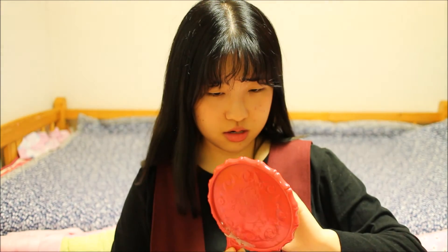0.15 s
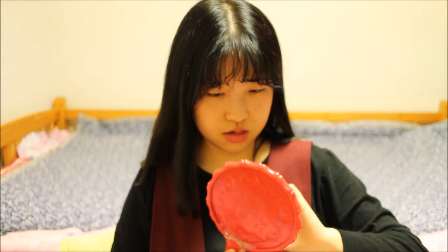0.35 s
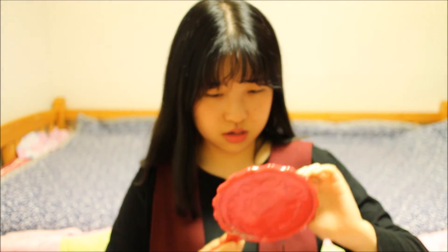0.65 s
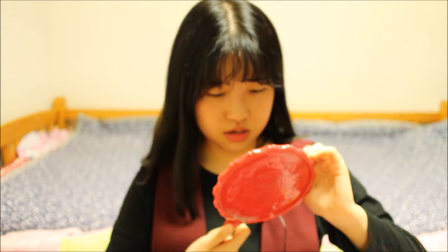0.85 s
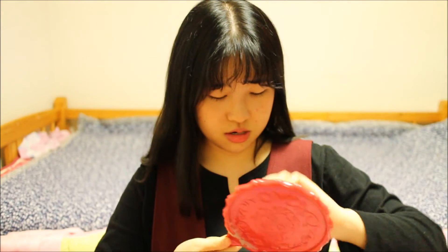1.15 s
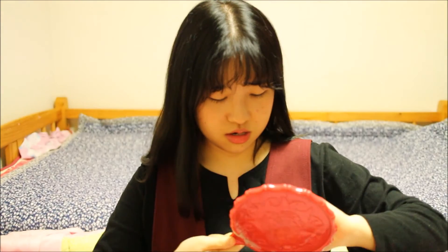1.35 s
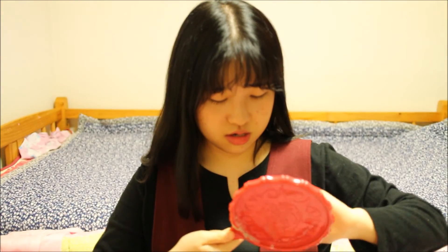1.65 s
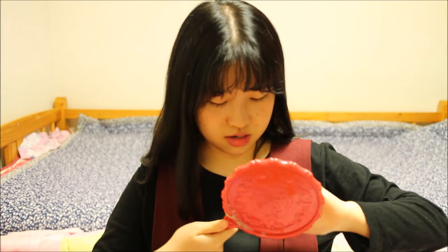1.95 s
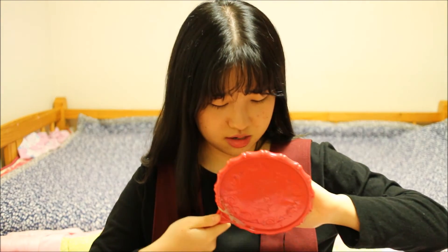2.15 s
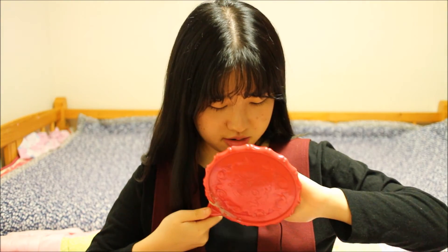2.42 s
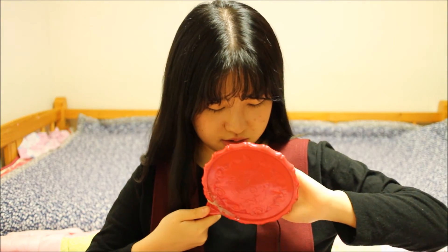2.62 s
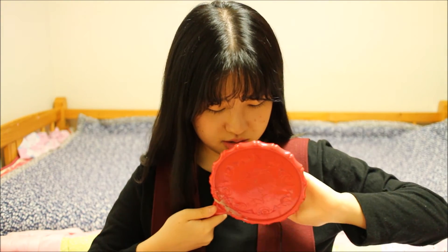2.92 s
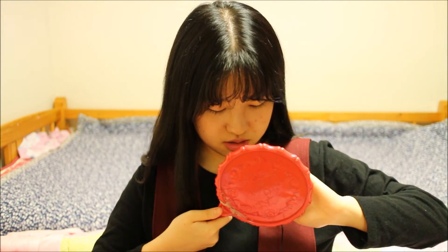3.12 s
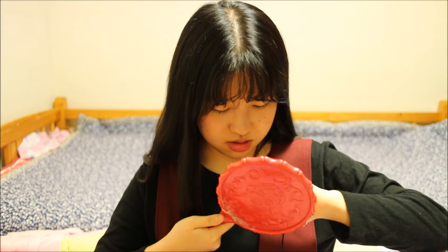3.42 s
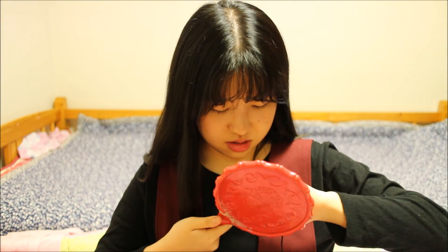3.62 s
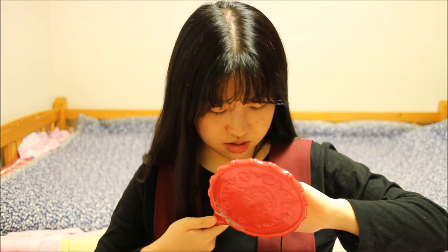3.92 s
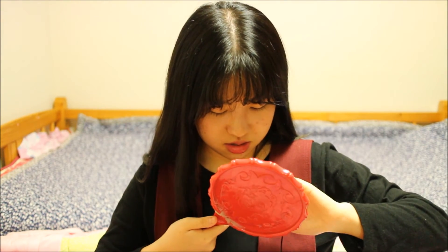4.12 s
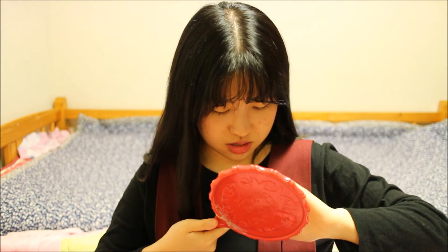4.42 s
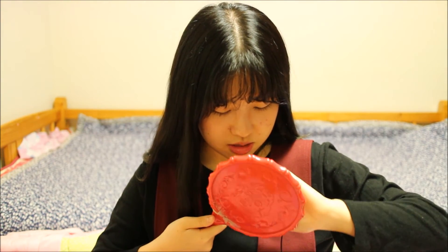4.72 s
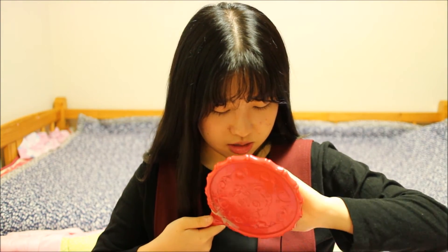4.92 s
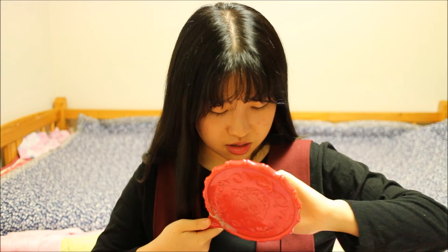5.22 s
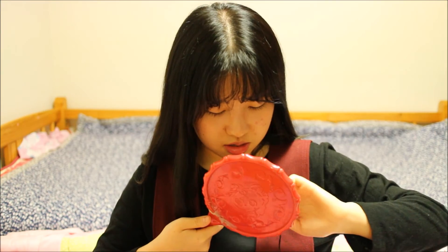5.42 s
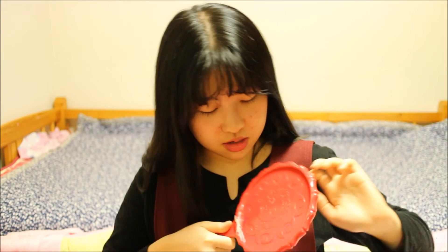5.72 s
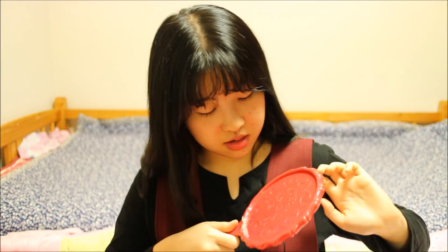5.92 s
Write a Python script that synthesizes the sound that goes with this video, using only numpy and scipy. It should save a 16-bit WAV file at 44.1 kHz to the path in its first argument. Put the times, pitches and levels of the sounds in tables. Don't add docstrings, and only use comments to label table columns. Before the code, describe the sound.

Close stereo microphone in a quiet, slightly hissy bedroom: nails and fingertips tap a round plastic hand mirror, each blow a sharp tick with a short hollow ring and small thump. A brief opening run gives way to faint skin rubs and dull house knocks, then uneven fast tapping resumes, mixing loud clacks and soft pad touches. Finally the handle turns with a low rub and grainy creaks.

```python
import sys
import numpy as np
from scipy import signal
from scipy.fft import rfft, irfft
from scipy.io import wavfile

SR = 44100
rng = np.random.default_rng(int(sys.argv[2]) if len(sys.argv) > 2 else 0)


def wav_out(sig):
    wavfile.write(sys.argv[1], SR, np.round(np.clip(np.atleast_2d(sig).T, -1, 1) * 32767).astype(np.int16))


def gain_from_db(level_db):
    decades = np.asarray(level_db, float) / 20
    return 10 ** decades


N = 267550
RING_T = np.arange(SR // 6) / SR

# [f/Hz, width/Hz, level/dB]
NAIL_COLOUR = [(3120, 443, -7.5), (6080, 1130, -5), (6760, 660, -0.5), (7810, 1760, -2.5), (9140, 1024, 6),
               (9556, 830, 4.5), (10450, 870, -5.5), (12290, 400, -5), (14400, 800, -16),
               (15300, 670, -17.5)]


def unit_energy(x):
    return x / np.sqrt(np.sum(x ** 2, axis=-1, keepdims=True) + 1e-20)


def modes(hz, t60):
    decay = gain_from_db(-60 * RING_T / np.clip(t60, 0.003, 1)[:, None])
    return np.sin(2 * np.pi * np.outer(hz, RING_T)) * decay


def sides(pan_db):
    return gain_from_db(np.multiply.outer([0.5, -0.5], pan_db))


def place(sounds, seconds):
    out = np.zeros((2, N + len(RING_T)))
    for k, start in enumerate(np.round(seconds * SR).astype(int)):
        out[:, start:start + len(RING_T)] += sounds[:, k]
    return out[:, :N]


def soften(x, contact_s):
    r = np.exp(-1 / (contact_s * SR))
    return signal.lfilter([(1 - r) ** 2], [1, -2 * r, r * r], x)


def radiate(x, low_hz):
    return signal.sosfilt(signal.butter(2, low_hz, "high", fs=SR, output="sos"), x)


def struck(level_db, mode_db, pan_db, hz, t60, scatter_db=1.6):
    strength = gain_from_db(mode_db + scatter_db * rng.standard_normal((len(level_db), len(hz))))
    shapes = modes(hz, t60)
    size = np.sqrt(np.sum((strength @ shapes) ** 2, axis=1))
    gain = (gain_from_db(level_db) / size)[:, None]
    return (sides(pan_db) * strength * gain) @ shapes


def resonances(x, peaks):
    out = 0
    for k, (hz, width_hz, db) in enumerate(peaks):
        r = np.exp(-np.pi * width_hz / SR)
        poles = [1, -2 * r * np.cos(2 * np.pi * hz / SR), r * r]
        band = signal.lfilter([(1 - r * r) / 2, 0, (r * r - 1) / 2], poles, x)
        out = out + (-1) ** k * gain_from_db(db) * band
    return out


def lumps(rate_hz):
    r = np.exp(-2 * np.pi * rate_hz / SR)
    slow = signal.lfilter([1], [1, -2 * r, r * r], rng.standard_normal(N + SR))[SR:]
    return slow / slow.std()


def preamp_hiss():
    # [f/Hz, density/dB]
    spectrum = np.array([(88, -30.5), (150, -12.5), (213, -10), (702, 2), (905, -3), (3500, -7),
                         (13400, -9.5), (16000, -11)])
    hz = np.maximum(np.fft.rfftfreq(N, 1 / SR), 1)
    shape = gain_from_db(np.interp(np.log(hz), np.log(spectrum[:, 0]), spectrum[:, 1])) * (hz < 15950)
    hiss = irfft(rfft(rng.standard_normal((2, N))) * shape, N)
    return gain_from_db(-69.5 + 3.5) * hiss / hiss.std()


def building_rumble():
    shared, *own = rng.standard_normal((3, N))
    band = signal.butter(1, [14, 45], "band", fs=SR, output="sos")
    rumble = signal.sosfilt(band, shared + 2.3 * np.array(own))
    rumble = soften(rumble, contact_s=0.00019) * gain_from_db(2.3 * lumps(3.9))
    return gain_from_db(-65.5) * rumble / rumble.std()


def house():
    # [t/s, f/Hz, level/dB, t60/s]
    knocks = [(0.098, 456, -66, .15), (0.262, 430, -58.5, .15), (0.674, 44.3, -38, 0.066),
              (0.758, 60.7, -40.5, 0.15), (0.899, 316, -49, 0.14), (.9, 740, -51, 0.12),
              (1.118, 476, -61, 0.17), (1.23, 688, -59.5, 0.33), (2.899, 490, -64, 0.58),
              (4.094, 480, -47, 0.16), (4.429, 490, -60, 0.59)]
    s, hz, db, t60 = np.transpose(knocks)
    blur = soften(rng.standard_normal((len(s), len(RING_T))), contact_s=0.006)
    soft_start = 1 - np.exp(-RING_T / 0.017)
    rings = gain_from_db(db)[:, None] * modes(hz, t60) * soft_start * np.cos(3 * np.pi * RING_T)
    rings *= 0.8 + 0.6 * blur / blur.std()
    return place(np.array([rings, rings]), s)


def bedroom(x):
    # [f/Hz, level/dB, t60/s]
    decay = np.array([(100, -42, 0.32), (395, -31.5, 0.16), (930, -23, 0.22), (2476, -25.5, 0.17),
                      (7920, -39, 0.34), (15420, -40.5, .12)])
    # [delay/s, level/dB]
    echoes = [(.0095, -27), (0.032, -38.5)]
    t = np.arange(SR // 3) / SR
    tail, edges_hz = 0, 70 * 2 ** np.arange(0, 8.1, 0.5)
    for low, high in zip(edges_hz, edges_hz[1:]):
        centre = np.log(low * high) / 2
        db, t60 = [np.interp(centre, np.log(decay[:, 0]), decay[:, c]) for c in (1, 2)]
        shared, *own = rng.standard_normal((3, len(t)))
        sos = signal.butter(2, [low, high], "band", fs=SR, output="sos")
        band = signal.sosfilt(sos, 4.8 * shared + own)
        band = unit_energy(band * gain_from_db(-60 * t / t60) * (t > 0.005))
        tail = tail + gain_from_db(db) * np.sqrt(high - low) * band / np.sqrt(SR / 2)
    for delay_s, db in echoes:
        spots = int(delay_s * SR) + np.arange(0, 60, 7)
        tail[:, spots] += gain_from_db(db - 17.5) * rng.standard_normal((2, 9))
    return signal.fftconvolve(x.mean(axis=0)[None], tail, axes=1)[:, :N]


def palm():
    # [f/Hz, width/Hz, level/dB]
    flesh = [(131.6, 92, 4), (280, 187, -3.5), (683, 170, -26)]
    turn_s, attack_s, fade_db_per_s = 5.7, 0.034, 21
    rub = resonances(resonances(rng.standard_normal(N), flesh), flesh)
    since = np.arange(N) / SR - turn_s
    rise = np.clip(1 + since / attack_s, 0, 1) ** 2
    level_db = -69.5 - fade_db_per_s * since + 3 * lumps(40)
    return rise * gain_from_db(level_db) * rub / rub.std()


def skin_brush():
    # [t/s, half length/s, level/dB]
    strokes = [
        (0.552, .05, -70),
        (0.677, 0.11, -64.5),
        (0.908, .06, -70),
        (1.0, 0.031, -65.5),
        (4.094, 0.037, -61),
    ]
    brush = resonances(rng.standard_normal((2, N)), NAIL_COLOUR)
    t = np.arange(N) / SR
    swell = sum(gain_from_db(db - 20 * np.abs(t - s) / half_s) for s, half_s, db in strokes)
    return swell * gain_from_db(2.7 * lumps(60)) * brush / brush.std()


def creaks():
    # [t/s, level/dB]
    lone = [
        (0.548, -58),
        (0.586, -57),
        (0.848, -64),
        (0.928, -59),
        (1.139, -68),
    ]
    # [start/s, end/s, gap/s, level/dB]
    slip_runs = [
        (5.698, 5.78, 0.011, -51.5),
        (5.81, 6.06, 0.019, -49),
    ]
    uneven, spread_db, fade_db_per_s = 0.142, 1.5, 36
    runs = [np.transpose(lone)]
    for start_s, end_s, gap_s, level_db in slip_runs:
        late, weak = rng.standard_normal((20, 2)).T
        s = start_s + gap_s * np.cumsum(1 + uneven * late)
        db = level_db + spread_db * weak - fade_db_per_s * (s - start_s)
        runs.append(np.array([s, db])[:, s < end_s])
    return np.hstack(runs)


def grip():
    # [f/Hz, level/dB, t60/s]
    grip_modes = [(93, 2.5, 0.011), (198, 1.5, 0.012), (342, -28, 0.065), (740, -14, 0.036)]
    s, level_db = creaks()
    hz, db, t60 = np.transpose(grip_modes)
    centred = np.zeros((len(s), len(hz)))
    slips = place(struck(level_db + 18.5, db, centred, hz, t60, scatter_db=3.0), s)
    return soften(slips, contact_s=0.0002)


def contacts():
    # [t/s, plate/dB, spot/dB (+ centre), upper re plate/dB, thump re plate/dB]
    centre_taps = [(0.0527, -21.5, 24, -5.5, -19), (0.202, -7, 3, -1, -10), (0.3599, -15, 17, -4.5, -16),
                   (0.4647, -18, 12, 1.5, -3.5), (1.2945, -5.5, 21, -6.5, -20.5),
                   (1.4444, -15, 12.5, 2.5, -7.5), (1.6011, -19, 12, -5.5, -14.5),
                   (1.6753, -20, 11, -6.5, -7), (2.219, -23.5, 11, -0.5, -2.5),
                   (3.3254, -13.5, 3.5, -13.5, -7), (3.5682, -14.5, 5.5, -4.5, -12),
                   (3.888, -30, 6.5, -2.5, -8), (4.0514, -15.5, 4, 1, -4),
                   (4.2434, -23.5, 8.5, -4.5, -12.5), (4.5394, -12.5, 8, -1.5, -14.5),
                   (4.851, -25, 7, -4.5, -8.5), (5.117, -15, 8, -6.5, -13.5), (5.408, -26, 8, 2.5, -3.5)]
    # [t/s, plate/dB, spot/dB (- rim), upper re plate/dB]
    rim_taps = [(0.0417, -29, 4.5, 5), (0.131, -18.5, 8.5, -2.5), (0.3846, -9.5, 7, -1.5),
                (1.7728, -17.5, -1.5, -11.5), (1.9909, -8, 3, -2), (2.068, -17.5, -1, -0.5),
                (2.2793, -22.5, 6.5, -8), (2.3344, -8, 0, 0.5), (2.5523, -17, 1, -0.5),
                (2.613, -20, -2, 6.5), (2.7899, -6, -0.5, 2.5), (2.8508, -16, -2, 3), (3.037, -7, 1.5, 2.5),
                (3.1256, -7, -0.5, 1.5), (3.4134, -8, -.5, -7), (3.6476, -16.5, 0, -2.5),
                (3.7277, -8, -1.5, -5), (4.0043, -20.5, 2.5, -5), (4.3262, -21, 6.5, -5.5),
                (4.638, -15, 2.5, -6), (4.6926, -9, 1, -3), (4.908, -11.5, 3, -11), (4.9752, -8.5, 1.5, -2),
                (5.1697, -11, 3.5, -8), (5.2575, -19.5, -1, -5.5), (5.4857, -17.5, 0, -4),
                (5.5737, -11, 1.5, 1.5)]
    # [t/s, plate/dB, spot/dB, thump re plate/dB]
    pad_taps = [(0.7637, -46.5, -3, -1.5), (1.386, -37, 9, -5), (1.8764, -38, 11, -5.5), (1.9, -40, 4.5, 0),
                (2.488, -29, 5, 1.5), (2.7356, -42.5, -1, 5.5), (2.762, -48.5, 2, -10.5),
                (2.978, -46.5, -2, 8), (2.9898, -21.5, 2.5, -3), (3.224, -51.5, 11, 8),
                (3.261, -32.5, 5, 0.5), (3.2902, -41, 5, -21), (3.8359, -41.5, 9, -2.5),
                (4.215, -33, 11.5, -3.5), (4.339, -38.5, 2, 2), (4.387, -37, 6, 10)]
    # [t/s, plate/dB]
    grazes = [
        (0.147, -56.5),
        (1.473, -51),
        (2.056, -41.5),
        (3.254, -53),
        (4.569, -50),
    ]
    rim_thump_db, thump_per_spot, thump_per_force = -6.5, -0.6, -0.32
    nail_db, nail_per_spot, nail_per_thump = -8.5, -0.22, 0.25
    rows = []
    for s, db, spot, upper, thump in centre_taps:
        excess = max(thump - rim_thump_db, -12.0)
        nail = nail_db + nail_per_spot * spot + nail_per_thump * excess
        rows.append((s, db, thump, upper, nail, spot))
    for s, db, spot, upper in rim_taps:
        thump = rim_thump_db + thump_per_spot * spot + thump_per_force * (db + 12)
        nail = nail_db + (nail_per_spot + nail_per_thump * thump_per_spot) * spot
        rows.append((s, db, thump, upper, nail, spot))
    rows += [(s, db, thump, 5.5, -6.5, spot) for s, db, spot, thump in pad_taps]
    rows += [(s, db, -8, 3.5, -1.5, 0) for s, db in grazes]
    return np.transpose(sorted(rows))


def hand_thump(level_db, thump_db, pan_db):
    # [f/Hz, level/dB, t60/s, slope/(dB per dB of thump)]
    hand_modes = [(104.3, 11, 0.013, 4.5), (285, -2.5, 0.01, 2), (510, -4, 0.006, -2.5)]
    pad_dulling = [0, -.6, -.8]
    hz, db, t60, slope = np.transpose(hand_modes)
    softness = np.clip(thump_db + 6, 0, 20)
    db = db + np.outer(softness, pad_dulling) + np.outer(thump_db, slope)
    return struck(level_db + thump_db + 3.5, db, pan_db - 7.5 + 0 * hz, hz, t60)


def plate_ring(level_db, spot_db, pan_db):
    # [f/Hz, level/dB, t60/s, slope/(dB per dB of spot), left-right re disc/dB]
    plate_modes = [(694.6, 0.5, 0.04, -1, -3), (785.6, 5.5, 0.027, 1.97, -7.5),
                   (945.6, -3, 0.052, 2.88, -3), (996, 6.5, 0.0095, 2.5, -5.5),
                   (1168.5, 2.5, 0.018, 3.09, 0), (1264, -2, 0.0042, 4, -5.5), (1570, -13, .022, .2, -1),
                   (3280, -10, 0.019, 3, -18), (4290, -23, 0.025, -4, 10.5), (4770, -30.5, .01, -8, 13),
                   (737, -24.5, .12, 3.5, -5), (997, -18.5, 0.11, 2.1, -1), (1130, -19.5, 0.11, 0.8, -2),
                   (953, -15, 0.15, 1.66, -3.5)]
    hz, db, t60, slope, side_db = np.transpose(plate_modes)
    return struck(level_db, db + np.outer(spot_db, slope), pan_db + side_db, hz, t60)


def upper_ring(level_db, upper_db, spot_db, pan_db):
    # [f/Hz, level/dB, t60/s, left-right re disc/dB]
    upper_modes = [(1836, -13, .028, -15.5), (1974, 6.5, 0.026, -9.5), (2232, -9.5, 0.011, -11),
                   (2503, -13, 0.027, -4.5)]
    per_spot = [1, -1.3, 0.7, -.1]
    hz, db, t60, side_db = np.transpose(upper_modes)
    return struck(level_db + upper_db - 9.0, db + np.outer(spot_db, per_spot), pan_db + side_db, hz, t60)


def nail_tick(level_db, nail_db):
    count = len(level_db)
    grit = rng.standard_normal((3, count, len(RING_T)))
    fading = gain_from_db(-60 * RING_T / 0.0065) + gain_from_db(-36.5 - 60 * RING_T / 0.087)
    tick = unit_energy(resonances((grit[0] + grit[1:]) * fading, NAIL_COLOUR))
    pan = sides(2.2 * rng.standard_normal(count))[:, :, None]
    return tick * gain_from_db(level_db + nail_db - 1.5)[:, None] * pan


def taps():
    # [t/s, left-right/dB]
    disc_position = [(0.0, 5), (1.67, 5.5), (3.01, 7.5), (3.75, 5), (4.07, 5.5), (5.93, 5.5), (6.07, 3)]
    s, plate_db, thump_db, upper_db, nail_db, spot_db = contacts()
    pan_db = np.interp(s, *np.transpose(disc_position))[:, None]
    level_db = plate_db + 15
    plate = plate_ring(level_db, spot_db, pan_db)
    upper = upper_ring(level_db, upper_db, spot_db, pan_db)
    thump = hand_thump(level_db, thump_db, pan_db)
    tick = nail_tick(level_db, nail_db)
    land_s = s + 0.0003
    pad = place(radiate(soften(thump, contact_s=0.00028), low_hz=59.5), s - 0.0001)
    ring = place(radiate(soften(plate, contact_s=0.00006), low_hz=356), land_s)
    brush_gain = gain_from_db(-20.5 - 0.88 * spot_db)[:, None]
    ring += place(brush_gain * soften(plate + thump, contact_s=0.00007), land_s - 0.00084)
    rim = place(radiate(soften(upper, contact_s=0.00006), low_hz=1411), land_s + 0.00013)
    ring -= 0.4 * signal.lfilter(*signal.iirpeak(370, 1.3, fs=SR), ring)
    body = pad + ring
    body -= 0.53 * signal.lfilter(*signal.iirpeak(585, 3.5, fs=SR), body)
    return body + rim + place(tick, land_s - 0.00005)


def scene():
    near = taps() + grip() + skin_brush()
    background = house() + preamp_hiss() + building_rumble()
    return near + gain_from_db(5.5) * bedroom(near) + background + palm()


def roll_off(x):
    return signal.sosfilt(signal.butter(12, 16890, fs=SR, output="sos"), x)


def record(dry):
    cut = signal.sosfilt(signal.butter(1, 18, "high", fs=SR, output="sos"), dry)
    cut = signal.sosfilt(signal.cheby2(10, 50, 17200, fs=SR, output="sos"), cut)
    return roll_off(cut)


dry = scene()
out = record(dry)
wav_out(out)
```